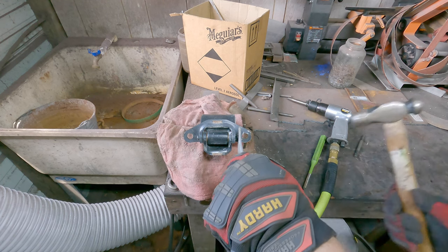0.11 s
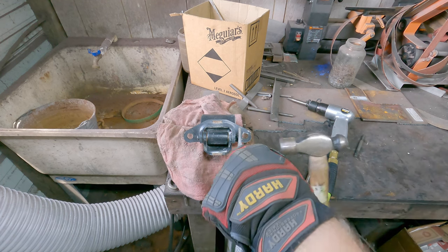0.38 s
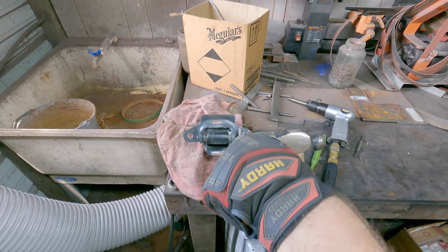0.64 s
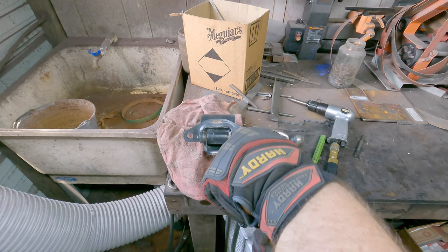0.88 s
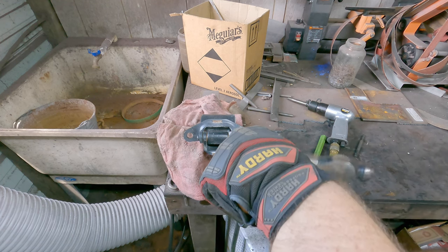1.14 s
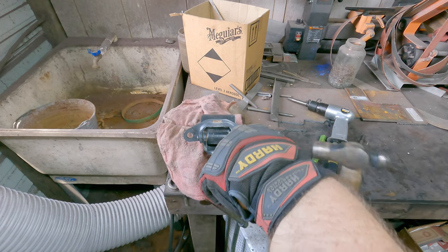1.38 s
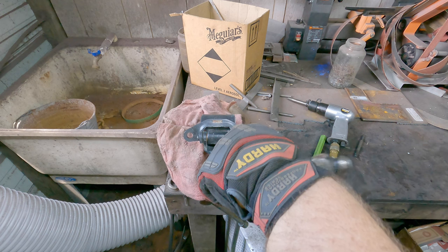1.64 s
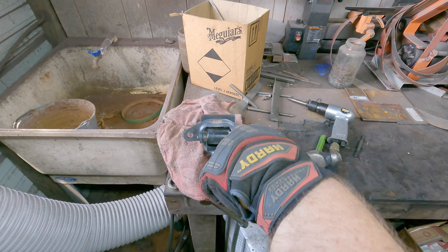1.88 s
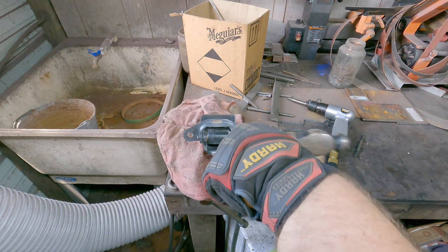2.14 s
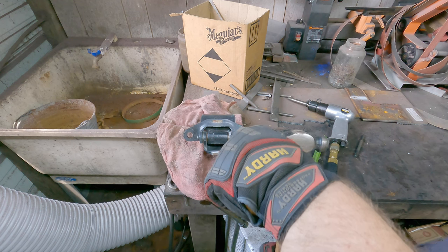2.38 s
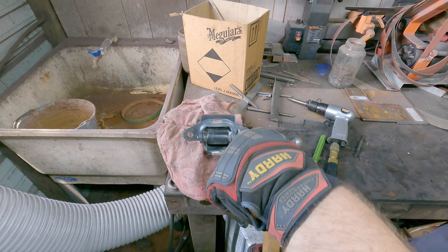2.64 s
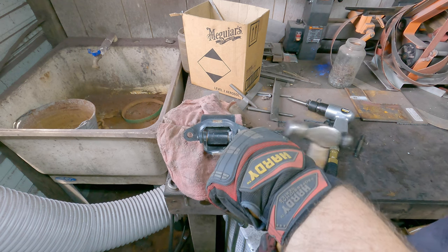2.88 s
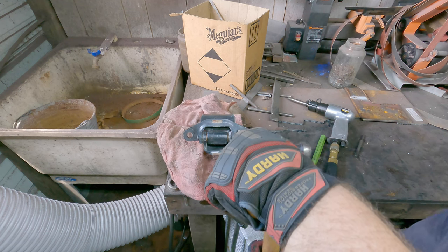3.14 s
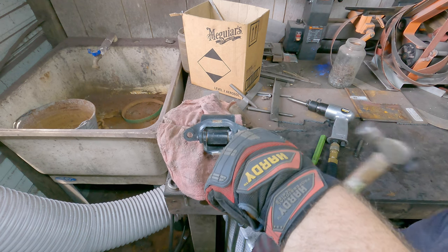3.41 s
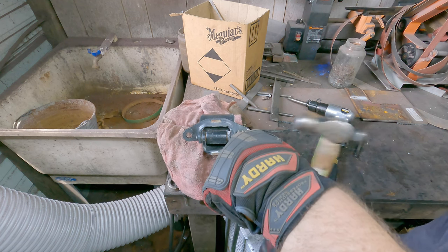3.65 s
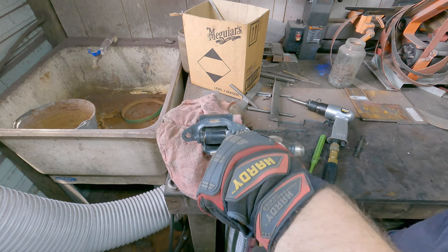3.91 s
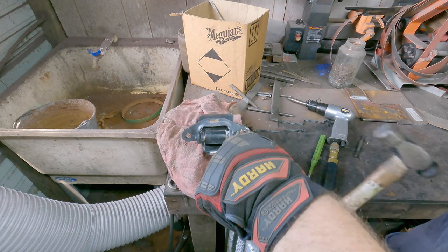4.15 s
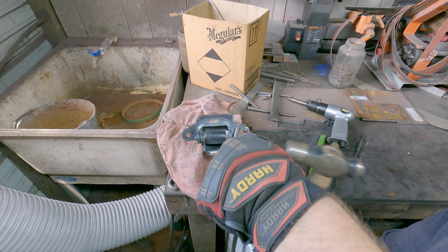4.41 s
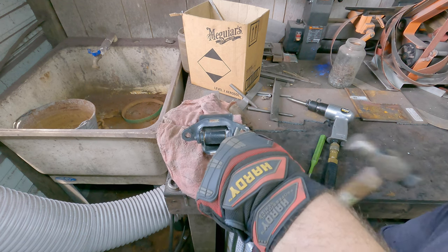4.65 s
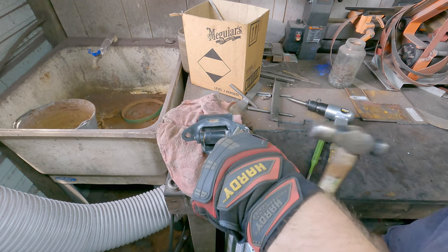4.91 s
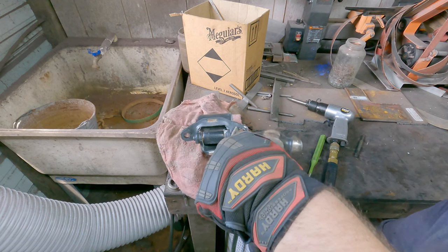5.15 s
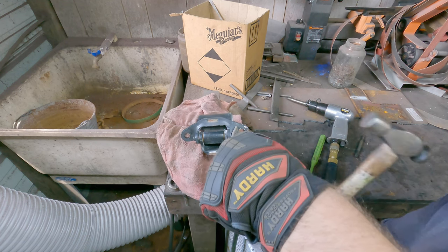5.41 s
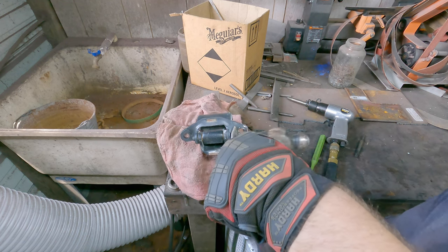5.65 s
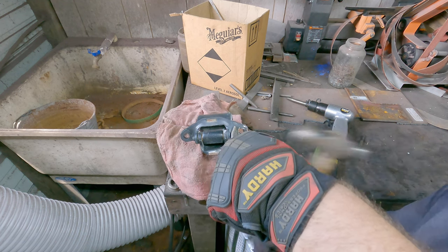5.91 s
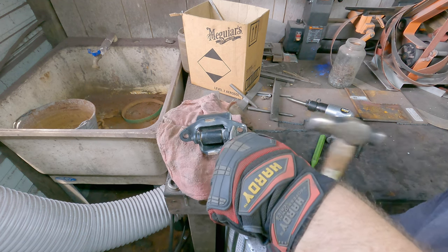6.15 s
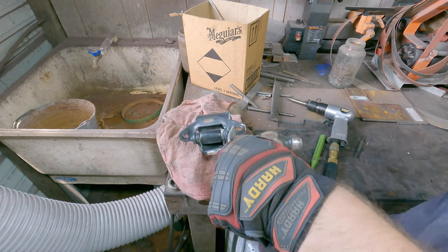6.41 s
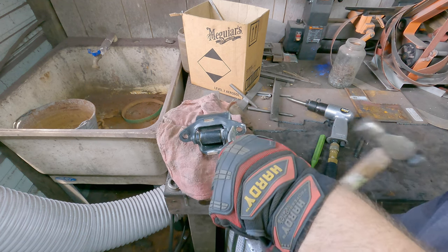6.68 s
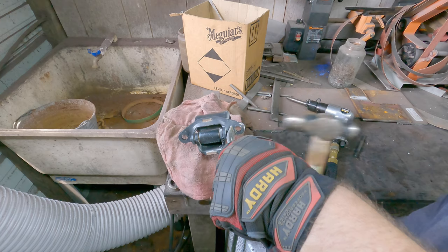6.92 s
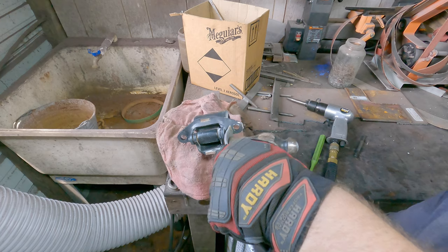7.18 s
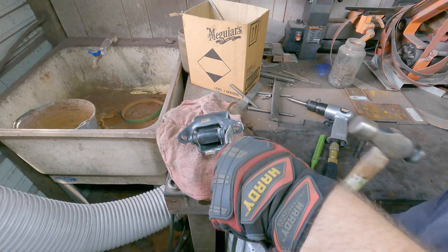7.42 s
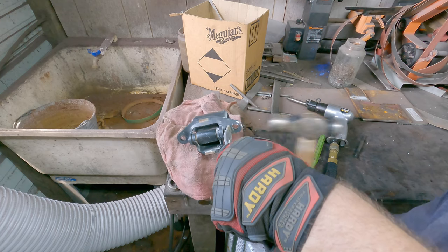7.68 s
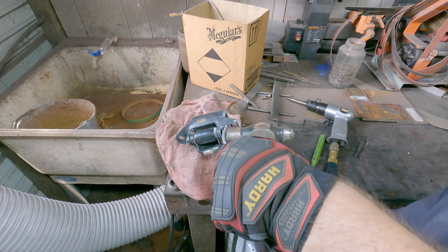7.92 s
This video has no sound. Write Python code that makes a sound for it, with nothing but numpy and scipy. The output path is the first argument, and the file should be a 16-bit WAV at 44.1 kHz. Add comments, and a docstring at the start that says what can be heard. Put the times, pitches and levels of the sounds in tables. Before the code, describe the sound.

A fan hums quietly in a garage, then loud sharp metal hammer blows ring a hinge and shake the bench about every 0.4 seconds.

```python
"""A fan hums in a garage while a glove rustles, and two light aiming taps fall before the loud blows.
Then a hammer drives a steel pin into a hinge held on a steel workbench.
Each blow cracks, rings the hinge and shakes the bench, all as decaying modes; shaped noise makes
the rattle, the room's answer, the fan, the rustles and a thin hiss. The loud blows overload the input."""
import sys
import numpy as np
from scipy import signal
from scipy.fft import rfft, irfft, next_fast_len
from scipy.io import wavfile
from scipy.ndimage import uniform_filter1d

SR = 44100
rng = np.random.default_rng(int(sys.argv[2]) if len(sys.argv) > 2 else 0)


def log_audio(samples):
    """Write samples as a 16-bit WAV file to the path given in sys.argv[1]."""
    # one column per channel
    frames = np.atleast_2d(samples).T
    # limit to full scale, then quantise
    limited = np.clip(frames, -1, 1)
    pcm = np.round(limited * 32767).astype(np.int16)
    wavfile.write(sys.argv[1], SR, pcm)


def rack_gain(trim_db):
    """Turn a fader trim in dB into the linear factor to multiply a signal by."""
    fader = np.asarray(trim_db, float)
    return 10 ** (fader / 20)


N = 355093  # length in samples

# Every contact of hammer, pin and hinge. Each row: start in seconds, crack force in dB,
# crack pitch in Hz, hinge ring in dB, bench thud in dB.
BLOWS = [(.937, -34.5, 5200, -45, -38.5), (2.736, -42, 3600, -47, -43), (3.153, -8.5, 5670, -25.5, -20),
         (3.1608, -3, 7800, -13.5, -17.5), (3.5738, 1, 7400, -11.5, -12), (3.9777, 1.5, 6240, -7.5, -11.5),
         (4.4129, -3, 3800, -18.5, -12.5), (4.454, -29.5, 12500, -50, -31.5),
         (4.8049, -4, 5600, -22, -16.5), (4.8105, -9.5, 5200, -21.5, -19.5), (4.864, -28, 5240, -45, -40),
         (5.2332, 1.5, 8130, -7, -13.5), (5.6446, 2, 5620, -7, -12.5), (6.0417, 1, 6340, -11.5, -12),
         (6.445, 1, 6000, -16, -12), (6.846, 2.5, 9500, -6.5, -13), (7.2465, 2, 7500, -14, -12.5),
         (7.6345, 0, 7560, -8, -13), (8.0093, -1, 6810, -6.5, -12.5)]


def evened(x):
    """Scales a signal to rms 1."""
    return x / np.sqrt(np.mean(x ** 2) + 1e-20)


def add(mix, start_s, sound):
    """Mixes a sound in at its start time, cut off at the end of the mix."""
    part = mix[round(start_s * SR):][:len(sound)]
    part += sound[:len(part)]


def coloured(gain, patchy_db=0):
    """Noise of rms 1 with a gain over frequency and random patches of more and less level."""
    _, _, spectrum = signal.stft(rng.standard_normal(N + 512), SR, nperseg=512)
    patches = rng.standard_normal(spectrum.shape)
    patches = uniform_filter1d(patches, size=6, axis=0)  # smooth over frequency
    patches = uniform_filter1d(patches, size=14, axis=1)  # smooth over time
    patchy = spectrum * rack_gain(patchy_db * evened(patches))
    noise = signal.istft(patchy, SR, nperseg=512)[1]
    size = next_fast_len(len(noise))
    shaped = rfft(noise, size) * gain(np.fft.rfftfreq(size, 1 / SR))
    return evened(irfft(shaped, size)[:N])


def swells(table):
    """Soft swells of patchy noise, each in its own band."""
    out = np.zeros(N)
    for start_s, length_s, level_db, centre_hz, width_hz in table:
        def band(hz):
            bell = 1 / (1 + ((hz - centre_hz) / width_hz) ** 2) ** 1.7
            return bell * hz / (hz + 900)  # less bass

        noise = coloured(band, patchy_db=4.5)
        swell = signal.windows.tukey(int(length_s * SR), .8)
        add(out, start_s, rack_gain(level_db) * noise[:len(swell)] * swell)
    return out


def fan():
    """Steady rush of air, as broad noise, with narrow humming bands of noise."""
    # Spectrum of the rush. Each row: frequency in Hz, relative level in dB per Hz.
    air = [(25, -27), (45, -13.5), (70, -3.5), (110, -10), (200, -9), (300, -9), (500, -10.5),
           (1000, -16.5), (1400, -25), (2000, -21.5), (2700, -31), (4500, -34), (7200, -36.5),
           (9000, -41.5), (12000, -47.5), (16500, -53.5)]
    # Fuzzy tones. Each row: centre in Hz, full width at half amplitude in Hz, rms level in dB.
    hum = [(63, 18, -55.5), (81, 13, -58), (111, 10, -62.5), (137, 8, -59), (230.5, 5.3, -56),
           (350.8, 6.9, -61), (394.5, 8.8, -60), (495.3, 22, -57.5), (792, 14, -61.5), (960, 10, -70.5),
           (1150, 3.7, -73), (1380, 7.2, -73.5), (1520, 7.2, -72)]
    air_hz, air_db = np.transpose(air)

    def rush_gain(hz):
        return rack_gain(np.interp(np.log(hz + 1), np.log(air_hz + 1), air_db))

    out = rack_gain(-47) * coloured(rush_gain, patchy_db=1.27)
    for centre_hz, width_hz, level_db in hum:
        out += rack_gain(level_db) * coloured(lambda hz: 1 / (1 + (2 * (hz - centre_hz) / width_hz) ** 2))
    return out


def airy_hiss():
    """Thin airy hiss that comes and goes in narrow bands of noise."""
    # Each row: start in seconds, length in seconds, level in dB, centre in Hz, width in Hz.
    hisses = [(.1, 0.45, -70, 6700, 400), (.4, 0.71, -73, 5600, 350), (.95, 0.4, -69, 6600, 400),
              (1.45, 2.6, -74.5, 7000, 400), (2.1, 0.85, -80, 8650, 400)]
    return swells(hisses)


def glove_rustles():
    """A glove slides on metal: short swells of broad noise."""
    # Each row: start in seconds, length in seconds, level in dB, centre in Hz, width in Hz.
    rustles = [(0, 0.098, -61.5, 3950, 6000), (.3, 0.12, -52, 2000, 3000), (1.16, 0.24, -52.5, 3900, 4170),
               (1.44, 0.2, -60.5, 3600, 3000), (1.75, 0.11, -58, 2800, 3500)]
    return swells(rustles)


def crack_tilt(hz, pitch_hz, force_db):
    """Steel near the crack pitch is struck hardest; a light touch lasts longer and loses the top (dB)."""
    octaves = np.log2(hz / pitch_hz)
    peak_db = 5 * np.exp(-(octaves / 0.079) ** 2)
    skirt_db = -6 * np.clip(octaves, -1.2, 1.4) ** 2
    dulled_db = 0.38 * np.minimum(force_db + 1, 0) * np.clip(np.log2(hz / 8000), 0, 1)
    return peak_db + skirt_db + dulled_db


def thud_tilt(hz, thud_db):
    """A full thud reaches the deep bench modes; a weaker one stays near the surface, tilted up (dB)."""
    full_thud_db = -11.5
    weaker_by_db = full_thud_db - thud_db
    db_per_octave = 0.28 + np.clip(0.54 * weaker_by_db, 0, 4)
    return db_per_octave * np.clip(np.log2(hz / 300), -.8, 1.2)


def dying(strikes, t60_s):
    """Power that each strike leaves behind, falling 60 dB in t60."""
    return signal.lfilter([1], [1, -rack_gain(-120 / (t60_s * SR))], strikes)


def aftersound():
    """Loose tools rattle briefly on the shaken bench, the room dies more slowly; both keep the blow's colour."""
    # Diffuse sound in bands. Each row: centre in Hz, rattle level in dB, rattle t60 in seconds,
    # room level in dB, room t60 in seconds.
    after = [(35, -13.5, 0.35, -20.5, 0.92), (80.5, -13.5, 0.21, -28.5, 0.84), (120, -20, 0.28, -25.5, .9),
             (198, -6.5, 0.16, -16.5, 0.92), (400, -11.5, 0.32, -15, 0.53), (880, -9, 0.14, -19.5, 0.51),
             (1375, -14, 0.15, -25.5, 0.52), (2250, -19, 0.065, -32.5, 0.51),
             (3960, -15.5, 0.067, -38.5, 0.61), (6600, -16, 0.081, -35, 0.54),
             (10250, -20, 0.065, -40, .42), (15000, -29, .06, -44.5, .3)]
    start_s, force_db, pitch_hz, _, thud_db = np.transpose(BLOWS)
    centres = np.log(np.transpose(after)[0])
    out = np.zeros(N)

    # loose parts chatter: the rattle's treble jumps together in short lumps
    chatter_db, chatter_s = 2, .004
    lump = int(chatter_s * SR) + 1
    chatter = uniform_filter1d(rng.standard_normal(N), lump)
    chatter = evened(uniform_filter1d(chatter, lump))

    for k, (hz, rattle_db, rattle_t60, room_db, room_t60) in enumerate(after):
        if hz < 1800:  # the thud feeds the low bands, the crack the high ones
            fed_db = thud_db + thud_tilt(hz, thud_db)
        else:
            fed_db = force_db + 0.32 * crack_tilt(hz, pitch_hz, force_db)
        strikes = np.zeros(N)
        strikes[np.round(start_s * SR).astype(int)] = rack_gain(2 * fed_db)  # doubled dB: power

        jumping_db = rattle_db + chatter_db * min(1, hz / 3000) * chatter
        rattle_power = rack_gain(2 * jumping_db) * dying(strikes, rattle_t60)
        room_power = rack_gain(2 * room_db) * dying(strikes, room_t60)
        level = np.sqrt(rattle_power + room_power)
        slow = np.exp(-hz / (2.5 * SR))  # each band builds up over a few of its cycles
        level = signal.lfilter([1 - slow], [1, -slow], level)

        share = np.eye(len(after))[k]  # neighbouring bands cross-fade in power

        def band_gain(f):
            return np.sqrt(np.interp(np.log(f + 1), centres, share)) * (f > 18)

        out += level * coloured(band_gain, patchy_db=2.6 * min(1, hz / 2000))
    return out


def ring(modes, rise_cycles, detune, scatter_db, phase_spread, tilt=np.zeros_like):
    """One blow on an object: its decaying modes, each a little off in pitch and strength by chance."""
    hz, db, t60_s = np.transpose(modes)[:, :, None]
    off, strength, phase = rng.standard_normal((len(modes), 3)).T[:, :, None]
    t = np.arange(SR // 2) / SR
    fall_db = db + tilt(hz) + scatter_db * strength - 60 * t / t60_s
    struck_hz = hz * (1 + detune * off)
    waves = rack_gain(fall_db) * np.sin(2 * np.pi * struck_hz * t + phase_spread * phase)
    rise = 1 - np.exp(-t * hz / rise_cycles)  # low modes take longer to swing up
    return (waves * rise).sum(0)


def steel():
    """Decaying modes: pin and hammer head crack and the hinge rings at once, the heavy bench follows."""
    # Modes of pin and hammer head, of the hinge, of the bench top.
    # Each row: frequency in Hz, relative level in dB, t60 in seconds.
    pin = [(2930, -3, 0.0074), (3430, -6.5, 0.027), (3900, -4.5, 0.007), (4200, -8, 0.0099),
           (5200, -3.5, .012), (5620, -4, 0.0093), (6010, -1, 0.0076), (6340, 0, 0.0059),
           (7260, -1, 0.0056), (7790, -5, 0.0093), (8600, -5.5, 0.0054), (9500, -6.5, 0.01),
           (10220, -3, 0.0073), (11550, -9.5, 0.008), (12660, -2, 0.0045), (13300, -9.5, 0.0066),
           (14400, -12, .007), (3360, -43, 0.36), (3800, -37.5, 0.47), (5440, -37, 0.23), (6220, -43, 0.25),
           (7400, -39.5, 0.18), (9700, -43.5, 0.15)]
    hinge = [(1590, -14.5, 0.034), (1774, -11, 0.047), (1917, -2, 0.055), (2003, -0.5, 0.054),
             (2107, 10.5, 0.018), (2280, -9, 0.02)]
    bench = [(48, -16, .4), (77, -12.5, .3), (140, -16.5, 0.15), (196.7, -1.5, 0.12), (257.6, -5.5, 0.21),
             (314.2, -6, 0.2), (371.7, -7, .16), (490.7, -2, 0.12), (592.4, -6, 0.097), (686, -13, .12),
             (790, -12.5, 0.053), (874.5, -8.5, 0.12), (1060, -5, 0.038), (1190, -13, 0.088)]
    bench_lag_s = .003  # the shock passes through hinge and cloth before the bench moves
    out = np.zeros(N)
    for start_s, force_db, pitch_hz, hinge_db, thud_db in BLOWS:
        crack = ring(pin, 0.8, 0.03, scatter_db=2.5, phase_spread=2.09,
                     tilt=lambda hz: crack_tilt(hz, pitch_hz, force_db))
        hinge_ring = ring(hinge, 1.5, 0.0087, scatter_db=2.0, phase_spread=0.42)
        thud = ring(bench, 0.3, 0.008, scatter_db=1.5, phase_spread=2.21,
                    tilt=lambda hz: thud_tilt(hz, thud_db))
        add(out, start_s, rack_gain(force_db) * crack)
        add(out, start_s, rack_gain(hinge_db) * hinge_ring)
        add(out, start_s + bench_lag_s, rack_gain(thud_db) * thud)
    return out


def scene():
    """All sources at one microphone."""
    mix = fan() + airy_hiss() + glove_rustles() + aftersound() + steel()
    return mix[None]  # one channel


def top_cut(x):
    """Nothing passes above the cut-off."""
    return signal.sosfilt(signal.butter(12, 16720, fs=SR, output="sos"), x)


def record(dry):
    """The input stage saturates with a firm knee at full scale; then a low-pass limits the band."""
    knee, edge_hz = 3, 15800
    clipped = dry / (1 + abs(dry) ** knee) ** (1 / knee)
    lowpass = signal.firwin(201, edge_hz, fs=SR)
    limited = signal.oaconvolve(clipped, lowpass[None], "same")
    return top_cut(limited)


dry = scene()
out = record(dry)
log_audio(out)
```